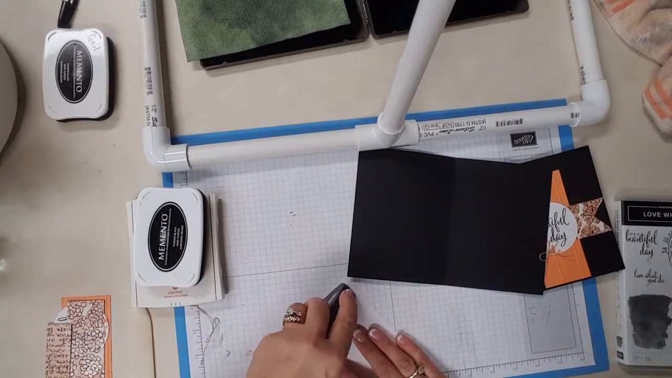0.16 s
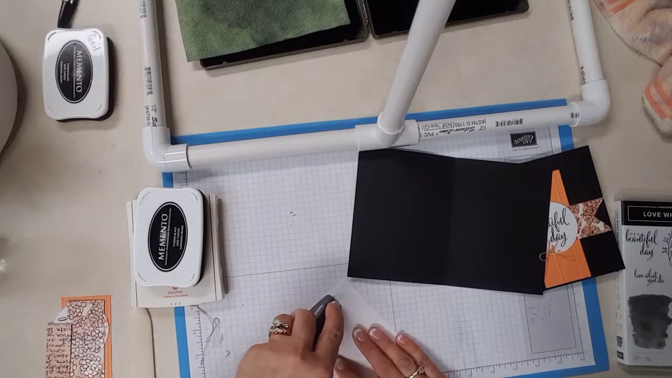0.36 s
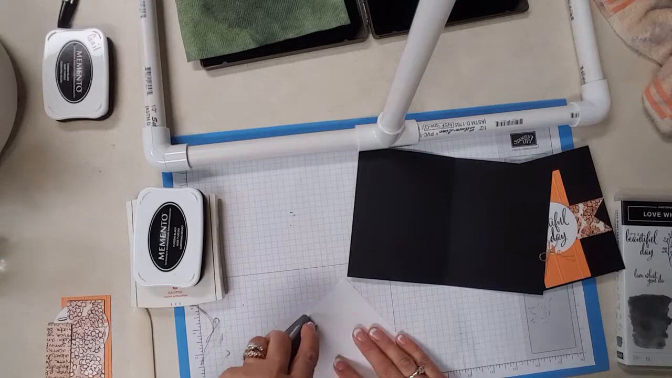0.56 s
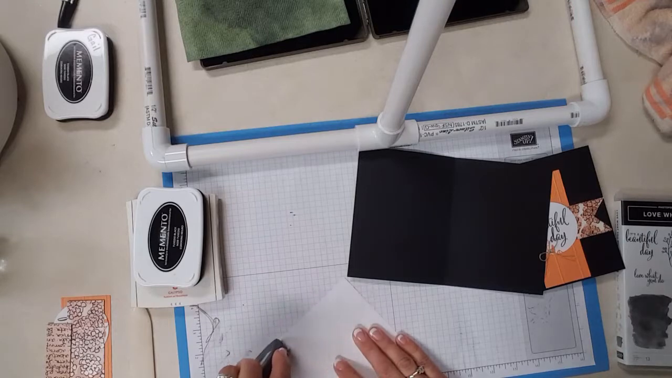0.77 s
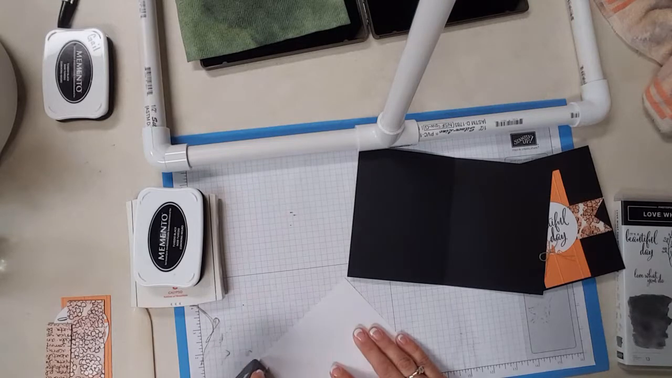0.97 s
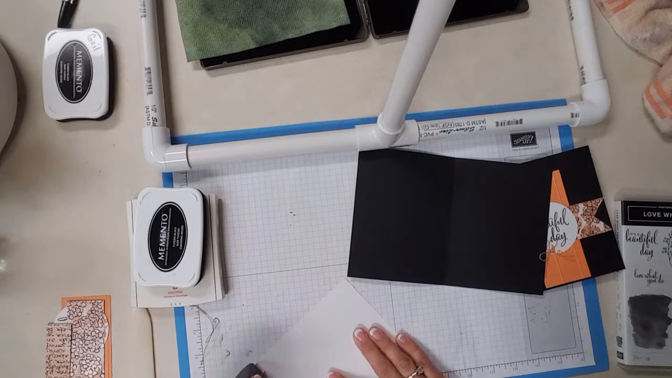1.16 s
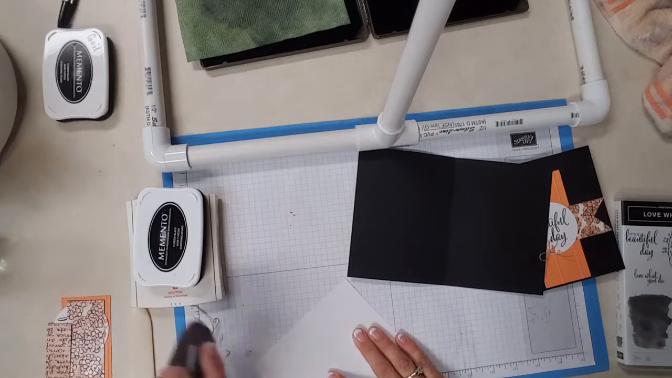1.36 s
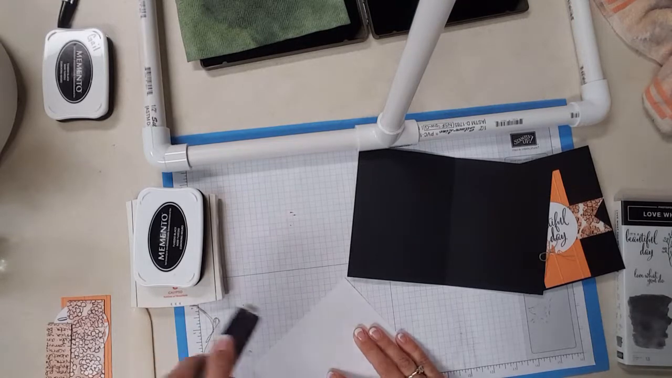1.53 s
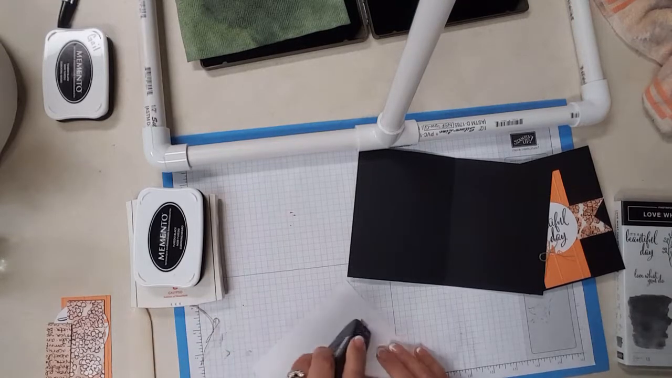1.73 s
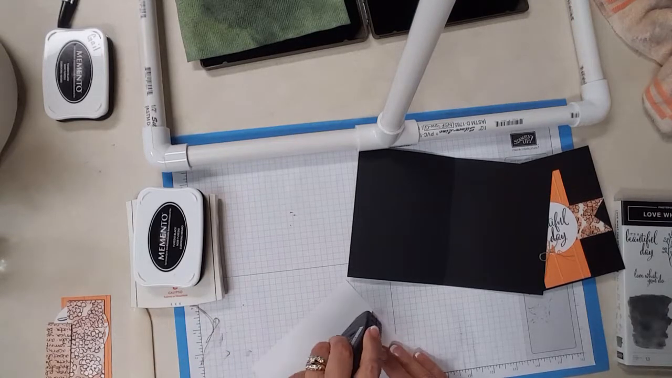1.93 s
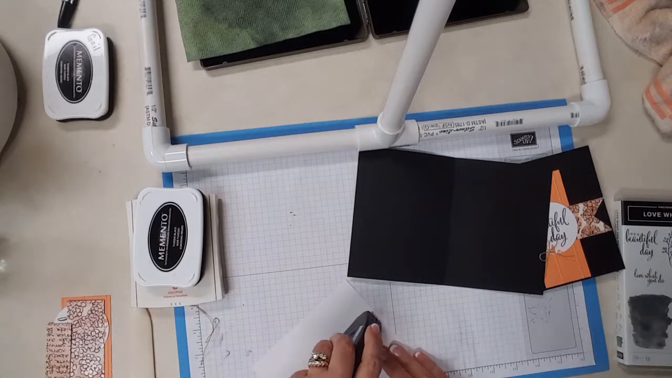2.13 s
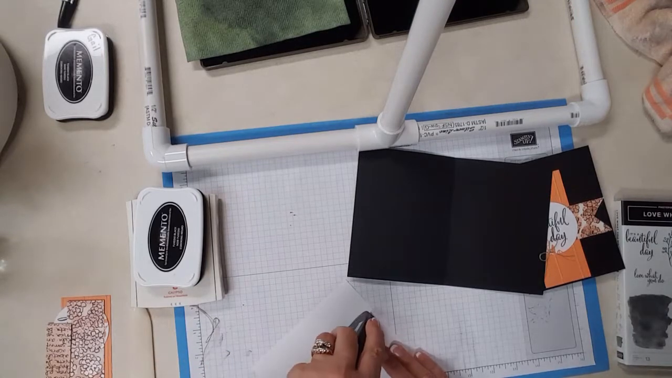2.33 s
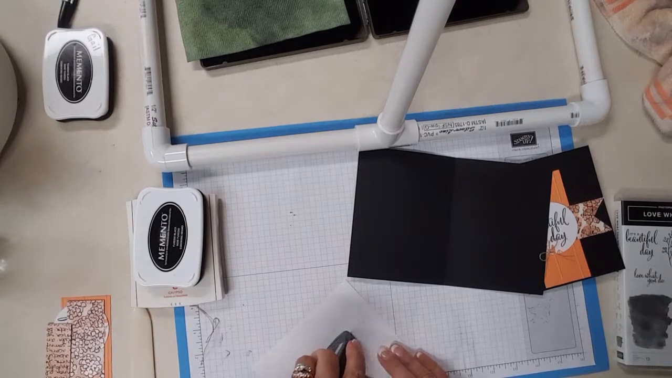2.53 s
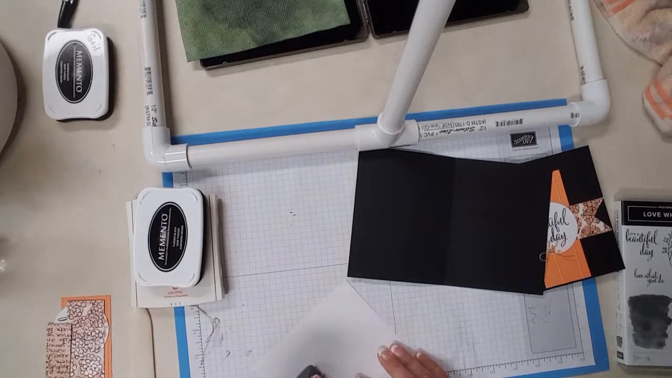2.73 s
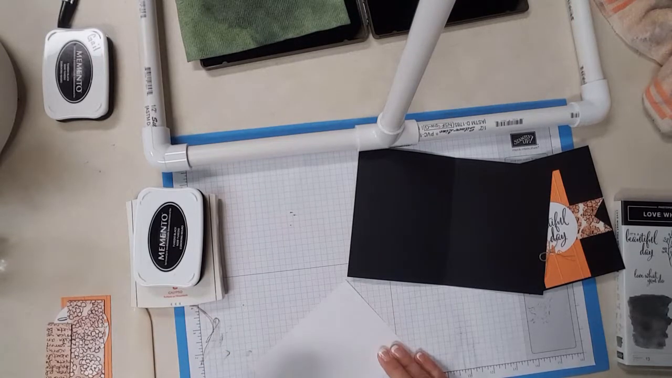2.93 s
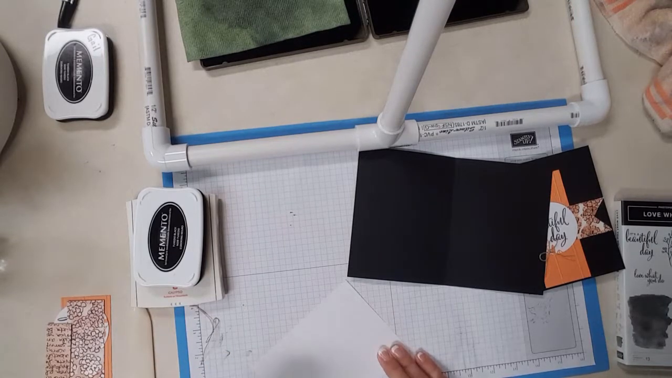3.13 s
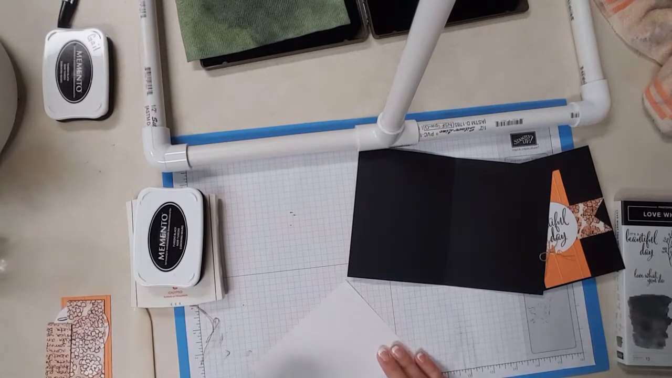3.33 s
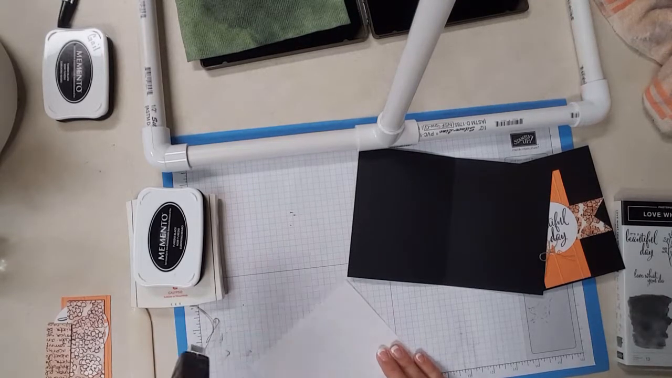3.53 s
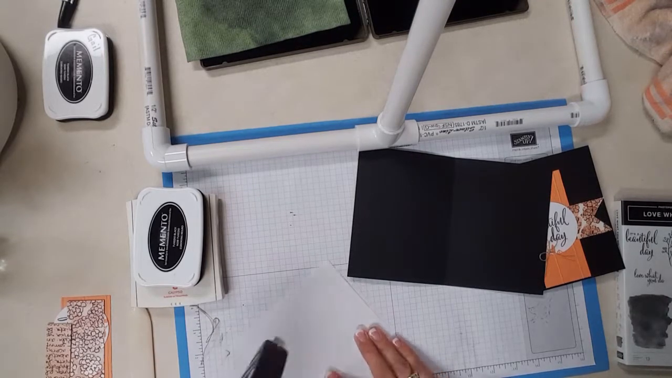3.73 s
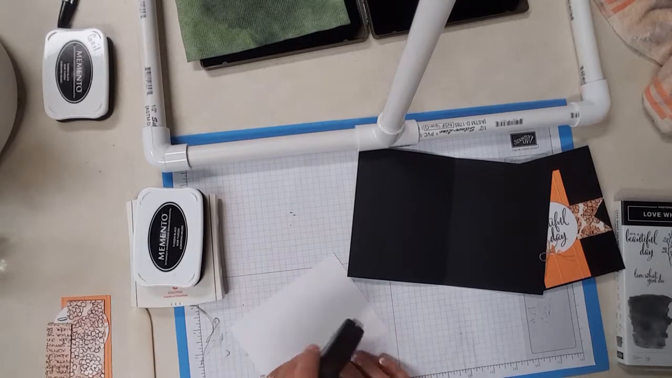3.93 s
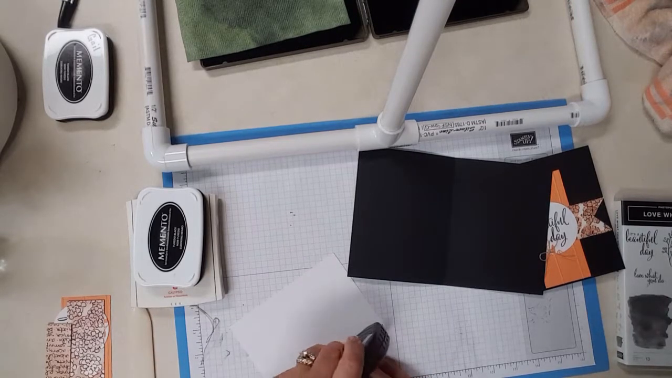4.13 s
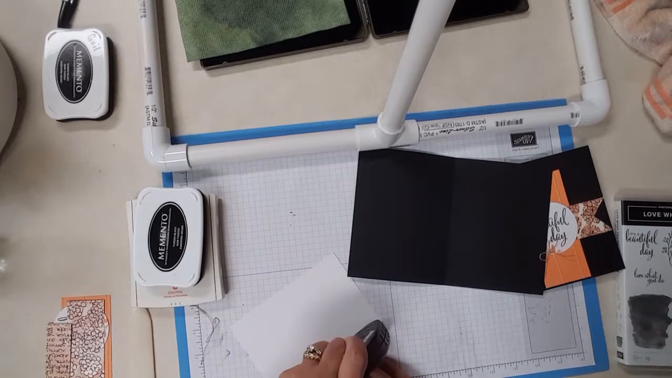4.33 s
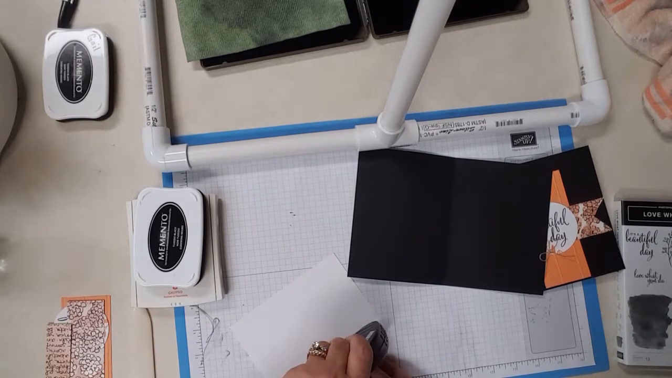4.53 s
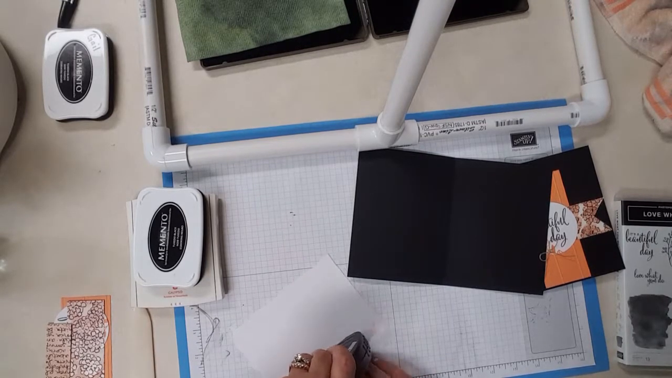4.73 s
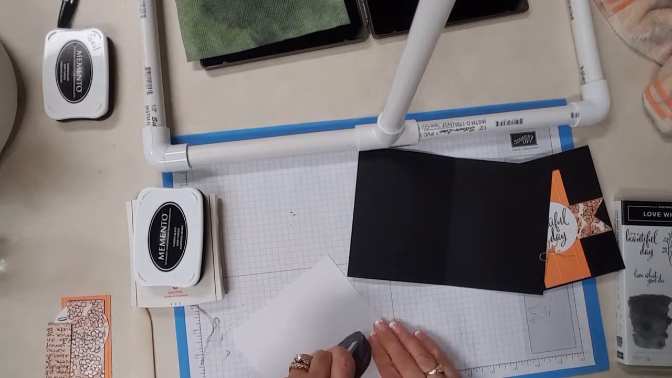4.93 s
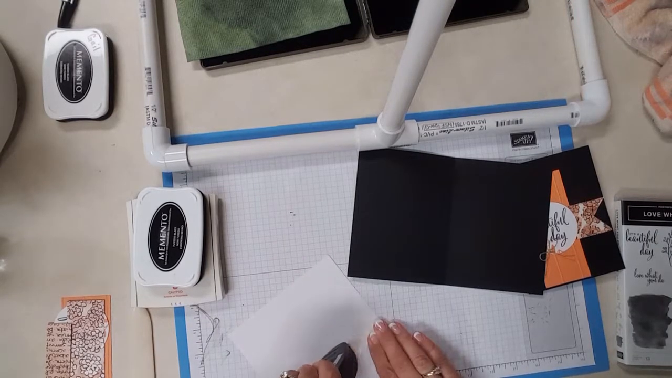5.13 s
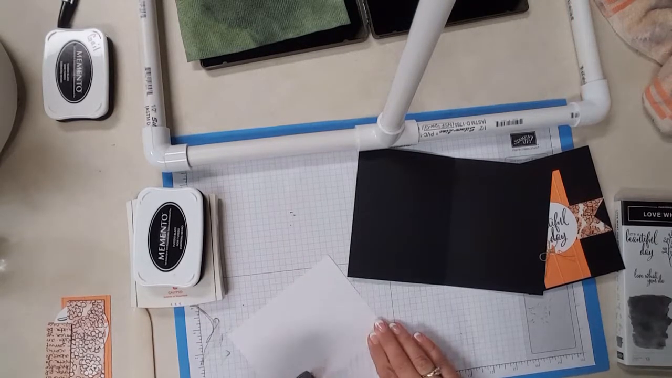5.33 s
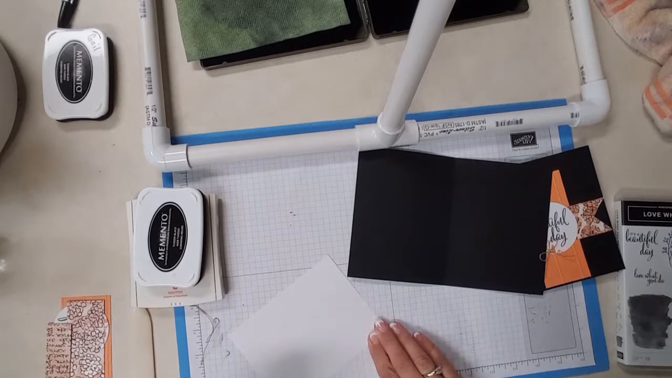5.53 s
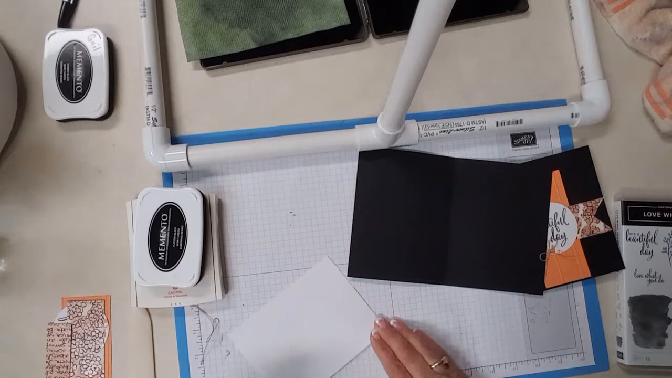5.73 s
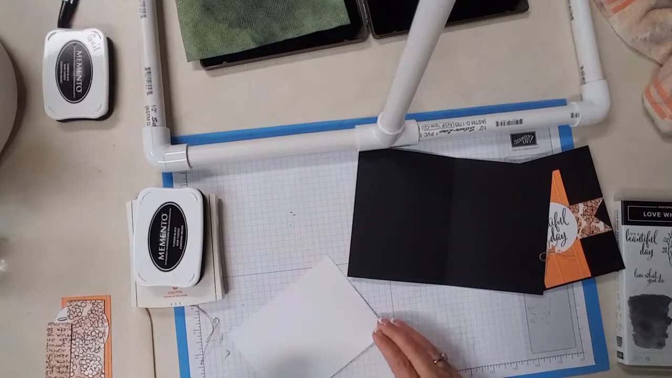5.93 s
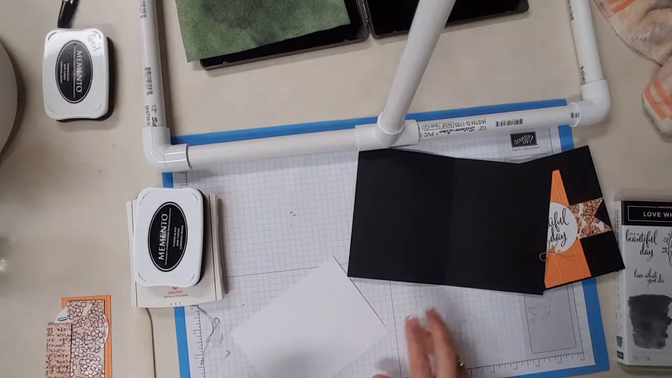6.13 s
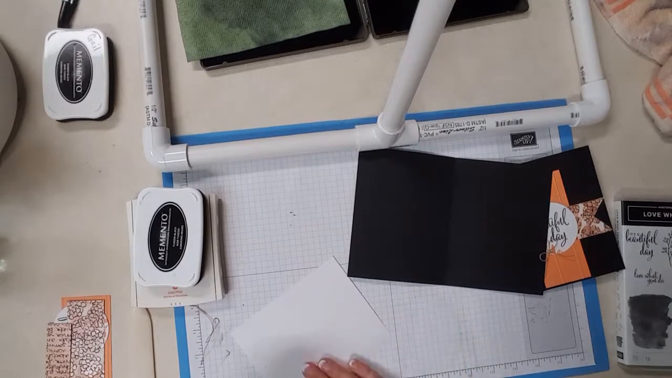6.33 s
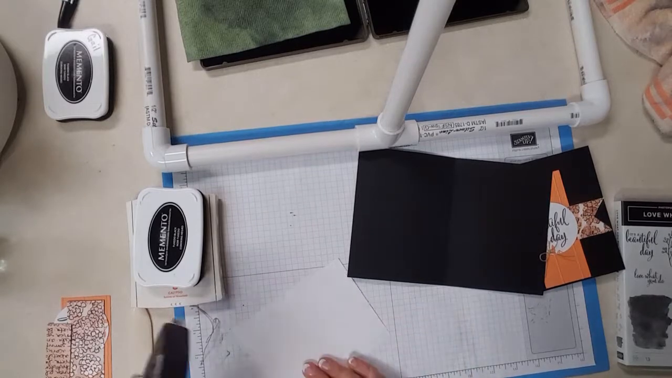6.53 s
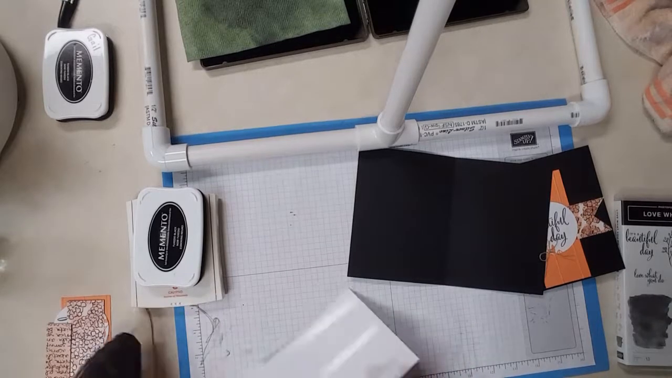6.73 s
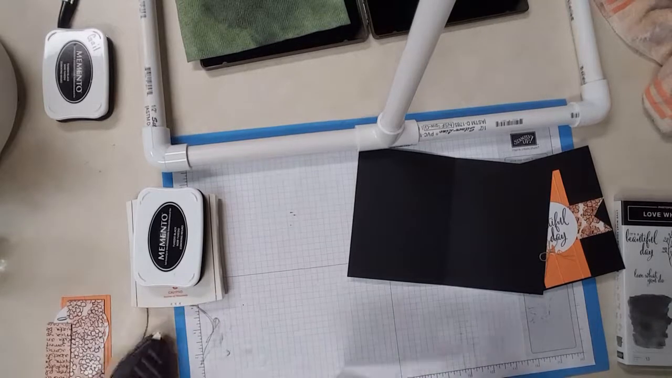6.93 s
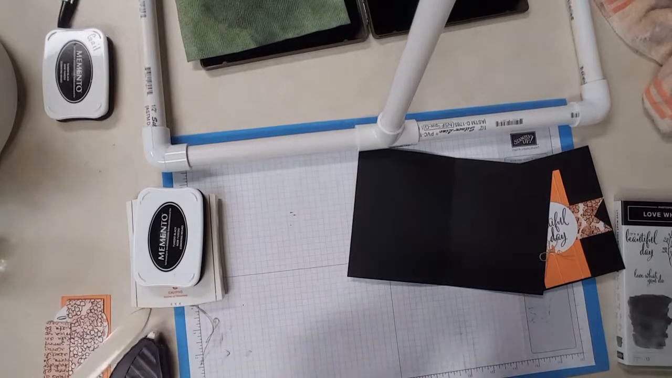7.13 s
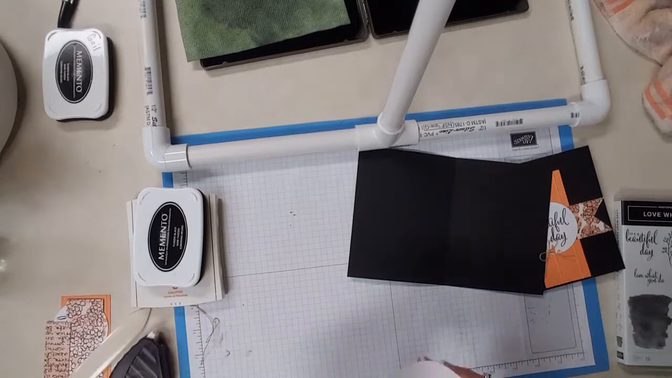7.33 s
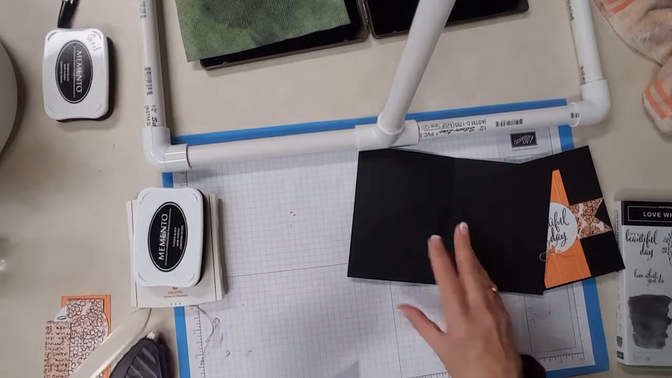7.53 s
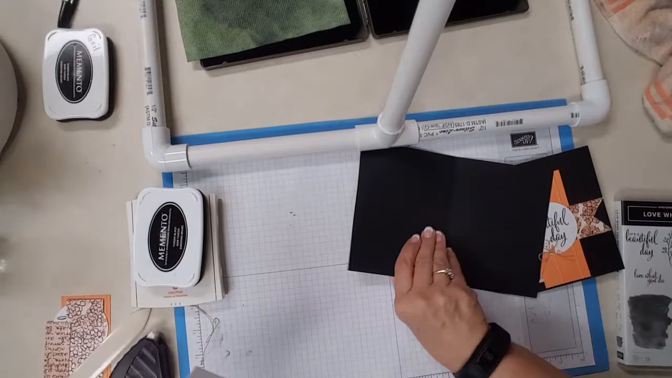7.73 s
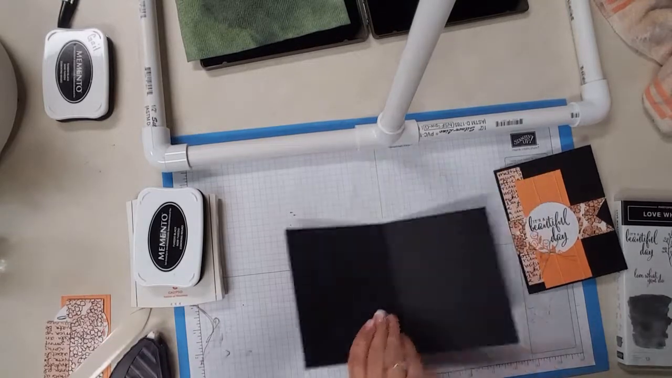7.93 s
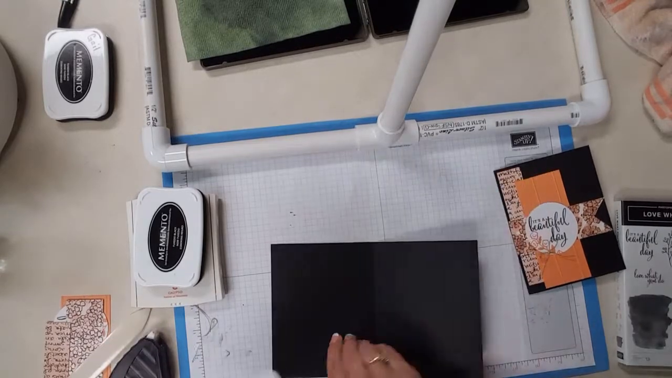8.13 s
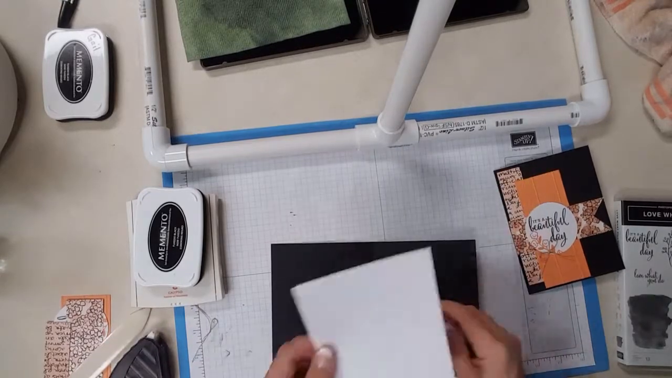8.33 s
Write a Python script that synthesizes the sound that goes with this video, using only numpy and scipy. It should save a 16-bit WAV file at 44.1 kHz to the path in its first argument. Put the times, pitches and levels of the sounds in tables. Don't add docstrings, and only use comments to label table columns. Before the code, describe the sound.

A quiet small room with faint air hiss, heard close above a craft table. Hollow plastic clicks at 0-0.2 s, then a soft ticking rasp from about 0.5 to 1.0 s as a tape runner rolls along paper, with a sharper knock at 0.85. Clicks and a short shiver at 1.4 as it lifts; small taps and sheet rustle to 2.1. A second ratcheting zip runs 2.4-3.0, bright clicks at 3.5, paper sliding until 4. A tap at 4.5, a very short rasp to 4.8, a click at 4.95, then the fastest, loudest zip at 5.1-5.5. Light double tap at 6.1, click at 6.5, thin paper rustle. At 6.88 the runner drops slightly left, bouncing loudly, hardest at 7.04, reels rattling, tumbling again around 7.4. From 7.7 stiff card scrapes and knocks, squeaks faintly around 8.2, and slaps sharply at 8.47.

```python
import sys
import numpy as np
from scipy import signal
from scipy.fft import rfft, irfft
from scipy.io import wavfile

SR = 44100
rng = np.random.default_rng(int(sys.argv[2]) if len(sys.argv) > 2 else 0)


def waveform_to_disk(signal):
    frames = np.transpose(np.atleast_2d(signal))
    scaled = np.clip(frames, -1, 1) * 32767
    samples = np.round(scaled).astype(np.int16)
    wavfile.write(sys.argv[1], SR, samples)


def volts_from_decibels(level):
    exponent = np.asarray(level, float) / 20
    return 10 ** exponent


N = 374409
T = np.arange(N) / SR

# t/s, pressure on the paper/dB, pull on the tape/dB
STROKES = [
    [(.004, -55, -65.5), (.1, -77.5, -88)],
    [(.309, -74, -70), (.345, -62, -63.5), (.461, -61.5, -71), (.513, -59.5, -65), (.702, -54, -59),
     (.82, -56, -66), (.89, -54.5, -62), (1.103, -61.5, -73.5), (1.18, -78, -78.5)],
    [(2.389, -68.5, -79.5), (2.542, -55.5, -56), (2.758, -52, -60.5), (3.051, -65, -75), (3.149, -82, -90)],
    [(4.54, -64.5, -72.5), (4.761, -57, -65.5), (4.849, -96, -101)],
    [(4.949, -57.5, -80.5), (5.064, -69, -76.5), (5.29, -48.5, -55), (5.368, -50.5, -55.5),
     (5.615, -63.5, -75.5), (5.679, -80, -88)],
]
# t/s, level/dB
CARD = [
    [(6.619, -76), (6.653, -76), (6.695, -66.5), (6.75, -70.5), (6.836, -64.5), (6.868, -63.5)],
    [(7.62, -75), (7.7, -66), (7.75, -54), (7.796, -53), (7.834, -47), (8.028, -57), (8.102, -48.5),
     (8.197, -61.5), (8.353, -67.5), (8.481, -48.5)],
]
# t/s, level/dB, hollow above it/dB, sharpness/dB
SHELL_TAPS = [(.0403, -37, -4, -13), (.1067, -56, 8, -11.5), (.1464, -68.5, 15, 1.5),
              (.178, -44.5, -12, -20), (0.3155, -49, 1.5, 4.5), (.3704, -50.5, -4, -20.5),
              (.3935, -49.5, -13.5, -0.5), (.848, -34.5, -7.5, -14), (1.2151, -55.5, -6, -14.5),
              (1.3842, -41, -11, -14), (1.4062, -36, -8.5, -1.5), (2.3866, -50.5, -15, 11),
              (3.1994, -66.5, 7, -10), (3.4785, -47.5, -1.5, 3.5), (3.52, -41.5, -10, 12),
              (4.5371, -42.5, -10, 7.5), (4.9392, -55.5, -15.5, -5.5), (4.9592, -53, 3, -0.5),
              (5.013, -61, -11, 19), (5.0495, -59.5, -8, 0.5), (5.8566, -60.5, -0.5, 2),
              (6.0466, -75, 19.5, 20), (6.1654, -60.5, 1.5, 14.5), (6.5051, -39, -4.5, 1)]
# t/s, level/dB, body above it/dB, sharpness/dB, body pitch f/Hz
EDGE_TAPS = [(1.4514, -47, 2.5, -20, 790), (1.6445, -65.5, -15, 16.5, 382), (1.786, -63, -8.5, 4, 604),
             (2.1286, -48, -39, 5, 1240), (3.489, -34.5, -3, -2, 893), (4.9455, -39.5, -7.5, 1, 912),
             (6.08, -39, -14.5, 9, 493), (6.092, -41, -13, 7, 484), (6.3903, -61, -7, 16.5, 472),
             (7.656, -56.5, -6.5, 4, 425), (7.7096, -40.5, -31, -14, 1290), (7.728, -52, -20, -13.5, 900),
             (7.754, -51.5, -10, -15.5, 1070), (7.8147, -32, -8, -19.5, 1134),
             (7.8593, -50, 6, -2.5, 419.3), (8.05, -53, -3.5, 10, 525), (8.0653, -41, 0, 6.5, 597.4),
             (8.098, -38.5, -3, -12, 686), (8.1117, -49, 9.5, -13.5, 444), (8.2656, -62, 22, -10.5, 500),
             (8.3934, -45.5, -2.5, -17.5, 806), (8.4361, -34, -5.5, -13.5, 874),
             (8.448, -41.5, -4.5, -1, 653), (8.4751, -21.5, -3.5, -13, 620.5)]
# t/s, level/dB, hollow above it/dB, paper snap/dB
LIFTS = [
    (1.395, -47, 0.5, -56.5),
    (3.481, -45.5, -6.5, -57),
    (6.082, -59.5, -1.5, -61),
    (6.502, -51.5, 4, -64),
]
LIFT_RISE_S, LIFT_HOLD_S = 0.0059, 0.0167
# f/Hz, width/Hz, level/dB
SHELL = [(582, 72, -1.5), (672, 75, -2), (780, 117, -8.5), (1120, 260, -14), (1530, 284, -15),
         (1904, 110, -8.5), (2107, 143.5, -5), (2264.6, 118.5, -4), (2520, 210, -7.5), (3000, 309, -12.5),
         (3455, 330, -10.5), (4324, 796, -20.5), (5640, 1770, -28), (7830, 1770, -29), (11330, 3300, -40.5),
         (14000, 2830, -49)]
# f/Hz, width/Hz, level/dB
DESK = [(324.5, 68, -10), (444, 31, -6), (618.2, 87.5, -0.5), (795.7, 70, -3), (995, 91, 0),
        (1132, 51.6, -4), (1234.5, 106, -5.5), (1522, 218, -7.5), (1830, 170, -6.5), (2126, 180, -6),
        (2500, 295, -9), (3158, 180, -13.5), (3838, 374, -20.5), (4948, 780, -24.5), (6600, 835, -20),
        (7976, 223, -11.5), (8570, 590, -21), (10990, 402, -21), (13500, 1730, -44.5)]
BAND_EDGES_HZ = [1350, 2800, 5000]


def rms_one(x):
    return x / np.sqrt(np.mean(x ** 2) + 1e-20)


def high_pass(x, hz):
    return signal.sosfilt(signal.butter(2, hz, "high", fs=SR, output="sos"), x)


def band_pass(x, edges_hz, order=2):
    return signal.sosfilt(signal.butter(order, edges_hz, "band", fs=SR, output="sos"), x)


def levels(tables):
    out = np.zeros((len(tables[0][0]) - 1, N))
    for rows in tables:
        s, *columns = np.transpose(rows)
        out += [volts_from_decibels(np.interp(T, s, c, left=-150, right=-150)) for c in columns]
    return out


def swell(s, db, rise_s, hold_s, fall_s):
    out = np.zeros(N)
    for at, top, rise, hold, fall in np.broadcast(s, db, rise_s, hold_s, fall_s):
        near = slice(max(round((at - 2 * rise) * SR), 0), round((at + hold + 2 * fall) * SR))
        late = np.maximum((at - T[near]) / rise, (T[near] - at - hold) / fall)
        out[near] += volts_from_decibels(top - 30 * np.clip(late, 0, None))
    return out


def at_hz(points, hz):
    f, value = np.transpose(points)
    return np.interp(np.log(hz + 1), np.log(f), value)


def stereo(mid, side, alike):
    return np.sqrt(1 + alike) * mid + np.sqrt(1 - np.minimum(alike, 1)) * side * [[1], [-1]]


def coloured(spectrum, source):
    # f/Hz, likeness
    likeness = [(60, 0.53), (240, 0.514), (950, 0.305), (3770, -0.088), (15000, 0.144)]
    hz = np.fft.rfftfreq(N, 1 / SR)
    mid, side = rfft(source) * volts_from_decibels(at_hz(spectrum, hz))
    alike = np.clip(at_hz(likeness, hz), 0, 1)
    return rms_one(irfft(stereo(mid, side, alike), N))


def grains(per_s, spread_db, channels=1):
    sizes = volts_from_decibels(spread_db * np.minimum(rng.exponential(1, N), 4)) * (rng.random(N) < per_s / SR)
    clumps = signal.lfilter([1], [1, -.9], sizes)
    return rms_one(rng.standard_normal((channels, N)) * (1 + clumps))


def ring(drive, hz, width_hz):
    r, w = np.exp(-np.pi * width_hz / SR), 2 * np.pi * hz / SR
    return signal.lfilter([0, np.sin(w)], [1, -2 * r * np.cos(w), r * r], drive + 1e-18)


def rings(rows):
    rise_s = 0.00051
    t = np.arange(8000) / SR
    out = np.zeros(N + len(t))
    for s, db, hz, width_hz in rows:
        shape = np.exp(-np.pi * width_hz * t) * (1 - np.exp(-t / rise_s))
        out[round(s * SR):][:len(t)] += volts_from_decibels(db) * np.sin(2 * np.pi * hz * t) * shape
    return out[:N]


def by_band(hits):
    upper_follows = 0.476
    s, db, low, sharp = np.transpose([row[:4] for row in hits])
    return np.transpose([s, db, low, upper_follows * sharp, sharp])


def damped(modes, widening):
    return np.array(modes) * [1, widening, 1]


def struck(modes, hits, rubbing, contact_ms, rough, scatter_db):
    s, mid_db, low, upper, top = np.transpose(hits)
    band_db = mid_db + np.array([low, 0 * s, upper, top])
    step = np.arange(600)
    fade = np.exp(-step * 1000 / SR / contact_ms)
    where = (np.round(s * SR).astype(int)[:, None] + step).ravel()
    hz, width_hz, mode_db = np.transpose(modes)
    band = np.searchsorted(BAND_EDGES_HZ, hz)
    weight = volts_from_decibels(mode_db) * width_hz
    scatter = rng.normal(0, 1, (len(s), len(hz)))
    out = np.zeros(N)
    for k, b in enumerate(band):
        share = weight[k] / np.sqrt(np.sum(weight[band == b] ** 2))
        trail = rough * rng.standard_normal((len(s), len(step))) * fade / np.linalg.norm(fade)
        force = ((step == 0) + trail) * volts_from_decibels(band_db[b] + scatter_db * scatter[:, k])[:, None]
        drive = np.bincount(where, force.ravel(), N + len(step))[:N]
        drive += rubbing[b] * np.sqrt(width_hz[band == b].mean() / SR)
        out += share * (-1) ** k * ring(drive, hz[k], width_hz[k])
    return high_pass(out, 220.)


def placed(x, left_db, lead_s, wet_db):
    # f/Hz, t60/s, left-right likeness
    decay = [(191.6, 0.452, 0.884), (937, 0.3216, 0.5), (3896, 0.2454, 0.5), (12600, 0.098, .1)]
    head_shade_hz = 250
    t, hz = np.arange(SR // 2) / SR, np.fft.rfftfreq(N + SR, 1 / SR)
    tail = np.zeros((2, len(t)))
    for f, t60, alike in decay:
        mid, side = rng.standard_normal((2, len(t)))
        band = band_pass(stereo(mid, side, alike), [f / 2.2, min(f * 2.2, .45 * SR)], order=1)
        tail += band * volts_from_decibels(-60 * t / t60)
    tail *= (1 - np.exp(-t / 0.00087)) / np.sqrt(np.sum(tail ** 2, axis=1, keepdims=True))
    shade = volts_from_decibels(hz / (hz + head_shade_hz) * [[left_db / 2], [-left_db / 2]])
    delay = np.exp(-2j * np.pi * hz * [[0], [lead_s]])
    room = 1 + volts_from_decibels(wet_db) * rfft(tail, N + SR)
    return irfft(rfft(x, N + SR) * shade * delay * room, N + SR)[:, :N]


def room_tone():
    # f/Hz, level per Hz/dB
    air = [(12, -48.5), (20, -28.5), (51, -10.5), (232, -11.5), (591, -16.5), (778, -17.5), (1310, -20),
           (1590, -20), (1880, -19), (4410, -29), (14400, -38)]
    # f/Hz, level/dB
    hum = [(120, -83), (151, -79.5), (240, -82), (360, -87), (480, -82)]
    tones = sum(np.sqrt(2) * volts_from_decibels(db) * np.sin(2 * np.pi * (hz * T + rng.random())) for hz, db in hum)
    noise = volts_from_decibels(-68.5) * coloured(air, rng.standard_normal((2, N)))
    return (noise + tones) * volts_from_decibels([[.6], [-.6]])


def thuds():
    # t/s, level/dB, f/Hz
    presses = [(0.328, -64, 94.5), (0.838, -53.5, 234), (3.618, -58.5, 227), (5.016, -51, 141.7),
               (5.038, -58.5, 86.1), (6.385, -55.5, 103.7), (7.06, -41.5, 123.3), (7.43, -47, 232),
               (7.65, -54.5, 234), (8.12, -58, 100.4)]
    # t/s, level/dB
    wrist = [
        [(0, -77), (3.5, -79.5), (3.66, -64), (4.1, -75.5), (6.8, -71.5), (7.06, -46.5), (7.35, -63.5),
         (7.6, -69), (7.9, -65.5), (8.49, -73)],
    ]
    rumble = rms_one(band_pass(rng.standard_normal(N), [65., 270.]))
    out = (volts_from_decibels(-2.0) * levels(wrist)[0] + volts_from_decibels(-19.0) * levels(STROKES)[0]) * rumble
    for s, db, hz in presses:
        t = np.clip(T - s, 0, None)
        out += volts_from_decibels(db + 5.0) * np.sin(2 * np.pi * hz * t) * np.exp(-t * hz / 1.43)
    return out


def sheet_level():
    # t/s, level/dB, 30 dB rise/s, hold/s, 30 dB fall/s (a row with a negative time
    slides = [(0.179, -74, 0, .001, 0.07), (0.321, -73.5, 0.07, .03, -0.04),
              (0.848, -70.5, 0.13, 0.019, 0.21), (1.657, -72.5, 0.04, .001, 0.07),
              (1.792, -67, 0.05, .001, 0.0756), (2.13, -83, -0.25, .02, -0.04),
              (2.395, -79, -0.31, .01, 0.24), (3.235, -81, -0.6, 0.00104, -0.08),
              (3.678, -65, 0.33, .11, 0.27), (4.54, -73.5, -0.16, 0.0097, 0.18),
              (4.79, -71, 0.2, 0.075, 0.06), (4.952, -74.5, 0.15, .001, 0.13),
              (5.794, -74.5, 0.05, .001, 0.57), (6.399, -72.5, 0.06, .001, 0.4)]
    pressure = levels(STROKES)[0] / volts_from_decibels(-57)
    stroked = volts_from_decibels(-70) * pressure ** 0.807
    s, _, _, snap_db = np.transpose(LIFTS)
    snapped = swell(s, snap_db, LIFT_RISE_S, LIFT_HOLD_S, fall_s=0.181)
    picked_up, dragged = levels(CARD[:1])[0], levels(CARD[1:])[0]
    carried = volts_from_decibels(-.5) * picked_up + volts_from_decibels(-12.5) * dragged
    return stroked + snapped + swell(*np.transpose(slides)) + carried


def paper():
    # f/Hz, level per Hz/dB
    sheet_colour = [(710, -26.5), (1200, 0.5), (1300, -3.5), (1450, -1.5), (6200, -4.5), (7960, -6),
                    (14400, -17.5)]
    # f/Hz, level per Hz/dB
    card_colour = [(88, -22.5), (150, -3), (650, -2.5), (885, -6.5), (1500, -0.5), (2570, -5),
                   (3240, -11.5), (6000, -22.5), (7800, -57.5), (13200, -120)]
    # t/s, level/dB
    singing = [
        [(8.05, -70.5), (8.12, -62), (8.21, -59.5), (8.3, -61.5), (8.38, -72.5)],
    ]
    sheet = sheet_level() * coloured(sheet_colour, grains(per_s=450., spread_db=3.5, channels=2))
    card = levels(CARD) * coloured(card_colour, grains(per_s=120.0, spread_db=5.0, channels=2))
    squeak = levels(singing) * rms_one(ring(rng.standard_normal(N), hz=1225, width_hz=85))
    return (volts_from_decibels(4.0) * sheet + card + squeak) * volts_from_decibels([[1.4], [-1.4]])


def glue_snaps():
    # t/s, level/dB
    strands = [(4.5962, -54), (4.6746, -61), (4.733, -61), (4.7424, -55), (4.752, -58), (4.757, -55),
               (4.762, -58), (4.772, -56), (5.0931, -61), (5.161, -59), (7.9971, -60)]
    strand_band_hz = [5500., 12500.]
    s, db = np.transpose(strands)
    step = np.arange(300)
    fade = np.exp(-step * 1000 / SR / .7)
    puffs = volts_from_decibels(db + 6.0)[:, None] * rng.standard_normal((len(s), len(step))) * fade
    where = np.round(s * SR).astype(int)[:, None] + step
    return band_pass(np.bincount(where.ravel(), puffs.ravel(), N), strand_band_hz)


def card_taps():
    slaps = by_band([row for row in EDGE_TAPS if row[0] > CARD[1][0][0]]) + [0, 0, -6.5, 1.5, 1.5]
    return volts_from_decibels(9.0) * struck(damped(DESK, 2.083), slaps, [0, 0, 0, 0], contact_ms=1.36, rough=0.43, scatter_db=1.5)


def knocks():
    hollow_hz = 628
    t = np.arange(2000) / SR
    out = np.zeros(N + len(t))
    for s, db, low, sharp, hz in [(*row, hollow_hz) for row in SHELL_TAPS] + EDGE_TAPS:
        shape = np.exp(-t * hz / 2.94) * (1 - np.exp(-t * hz * 3.44))
        out[round(s * SR):][:len(t)] += volts_from_decibels(db + low + 4.0) * np.sin(2 * np.pi * hz * t) * shape
    return out[:N]


def handling():
    # t/s, level/dB, f/Hz, width/Hz
    clear_rings = [(.848, -36.5, 2027, 60), (1.3845, -46, 2173, 120), (.316, -48, 1397, 100),
                   (2.1287, -37, 3220, 320), (2.1287, -45, 4200, 500), (2.1287, -55.5, 2247, 150),
                   (4.5375, -45.5, 2550, 200), (4.5375, -47, 3570, 250), (1.4062, -31, 738.4, 55),
                   (1.412, -42, 1150, 120), (1.409, -38.5, 2008, 50), (1.436, -47.5, 790, 35),
                   (3.4905, -28, 2071, 110), (3.5205, -27, 4230, 500), (3.521, -43.5, 733, 50),
                   (4.5375, -38, 2135, 60), (6.08, -29, 2380, 350), (6.092, -27.5, 2715, 300),
                   (6.506, -39.5, 1007, 100), (6.506, -42.5, 1796, 120), (7.8146, -36.5, 1527, 90),
                   (7.815, -38, 2500, 400), (8.2316, -53, 1700, 250), (8.11, -46, 2700, 400),
                   (7.845, -43, 494, 40), (7.845, -48, 317, 40), (8.4746, -26, 430.6, 60),
                   (8.4746, -24.5, 1226, 80), (8.4746, -26.5, 807, 100), (8.4755, -26, 3100, 600),
                   (8.476, -30.5, 1550, 200), (8.476, -30, 8040, 600), (8.065, -43.5, 8300, 700),
                   (8.05, -50, 8300, 700), (7.7099, -45.5, 2500, 400), (8.449, -37.5, 3000, 500)]
    s, db, hollow_db, _ = np.transpose(LIFTS)
    loose = grains(per_s=350.0, spread_db=3.0)[0]
    low = loose * swell(s, db + hollow_db, LIFT_RISE_S, LIFT_HOLD_S, fall_s=0.177)
    mid = loose * swell(s, db, LIFT_RISE_S, LIFT_HOLD_S, fall_s=0.116)
    shiver = [low * volts_from_decibels(0.5), mid * volts_from_decibels(6.5), mid * volts_from_decibels(-6.0), mid * volts_from_decibels(-28.5)]
    desk_lows = [m for m in DESK if m[0] < BAND_EDGES_HZ[0]]
    shell_highs = [m for m in SHELL if m[0] > BAND_EDGES_HZ[0]]
    held = damped(desk_lows + shell_highs, 1.217)
    before_card = [row[:4] for row in EDGE_TAPS if row[0] < CARD[1][0][0]]
    taps = by_band(SHELL_TAPS + before_card) + [0, 0.5, -6.5, 3.0, 5.0]
    body = volts_from_decibels(4.0) * struck(held, taps, shiver, contact_ms=1.13, rough=0.488, scatter_db=1.0949)
    return knocks() + rings(clear_rings) + body


def drop():
    # t/s, level/dB, hollow above it/dB, sharpness/dB
    bounces = [(6.8777, -16.5, 2, -9.5), (6.8944, -25.5, -2.5, -3.5), (6.9114, -19.5, 1, -23),
               (6.9651, -19, 2, -30.5), (7.0335, -18, 4, -3), (7.0374, -16, -18, 3.5),
               (7.0514, -22, 1, -12.5), (7.0674, -26.5, 5, -13), (7.1197, -29, -5.5, -6),
               (7.1264, -36, -16, 6.5), (7.2424, -32, -3, -14), (7.2964, -48.5, 15, -20.5),
               (7.3597, -33, 0, 0), (7.419, -24, -6, -5), (7.436, -25.5, 0, -10), (7.4789, -38, -14, -18.5)]
    # t/s, level/dB, hold/s, 30 dB fall/s, jingle above it/dB
    rattle = [
        (6.88, -35.5, 0.1024, 0.026, -19),
        (7.036, -28, 0.018, 0.3183, -14),
        (7.358, -58.5, 0.029, 0.23, 0),
        (7.415, -40, 0.0256, 0.1147, -5.5),
    ]
    # t/s, level/dB, f/Hz, width/Hz
    clear_rings = [(6.8785, -24, 623, 50.1), (6.8778, -19.5, 1132, 70), (6.8785, -25, 3330, 250),
                   (6.894, -32, 1846, 70), (6.895, -34, 3400, 250), (6.9, -31.5, 2379, 80),
                   (6.9115, -34, 1550, 80), (6.9645, -26.5, 1437, 90.6), (6.879, -26, 1320, 70),
                   (6.9115, -20.5, 995, 60), (6.9115, -22.5, 1231, 64.81), (6.916, -25.5, 628, 45.1),
                   (6.9645, -25.5, 628, 37.04), (6.9645, -22, 1115, 70), (6.9645, -23.5, 2146, 80),
                   (7.0343, -7, 1150, 500), (7.0335, -17, 1112, 54), (7.0335, -19.5, 746, 55.56),
                   (7.036, -20.5, 1830, 50), (7.037, -18, 2140, 90), (7.0345, -26, 8100, 90),
                   (7.037, -23, 7973, 110), (7.052, -28.5, 2115, 55), (7.0685, -19.5, 608.5, 28),
                   (7.034, -13, 3550, 450), (7.037, -27.5, 5000, 299), (7.052, -28, 1760, 60),
                   (7.062, -25.5, 3746, 100), (7.0685, -29, 1555, 60), (7.0685, -28.5, 1001, 50),
                   (7.0685, -28.5, 464, 50), (7.086, -24.5, 824.8, 30), (7.114, -30.5, 815, 35),
                   (7.114, -30, 578.7, 33), (7.1265, -35.5, 8070, 120), (7.138, -33.5, 7860, 120),
                   (7.243, -40, 2050, 45), (7.243, -38, 1742, 60), (7.293, -37, 522, 23.9),
                   (7.293, -38, 316.5, 40), (7.3605, -36, 993, 200), (7.4185, -22, 1977, 70),
                   (7.4185, -22, 2412, 120), (7.4185, -31.5, 1790, 90), (7.4789, -44.5, 1808, 79.5),
                   (7.4195, -25, 7800, 350), (7.4355, -33, 8200, 500), (7.4245, -32, 2200, 250),
                   (7.44, -36, 420, 60), (7.436, -26, 1919, 150), (7.436, -28, 2200, 200),
                   (7.4835, -40, 1900, 200)]
    s, db, hold_s, fall_s, jingle_db = np.transpose(rattle)
    loose = grains(per_s=600., spread_db=3.5)[0]
    body = loose * swell(s, db, 0.0123, hold_s, fall_s)
    jingle = loose * swell(s, db + jingle_db, 0.0119, 0.437 * hold_s, 0.8 * fall_s)
    rubbing = [body * volts_from_decibels(4.5), body * volts_from_decibels(8.5), body * volts_from_decibels(0.5), jingle * volts_from_decibels(9.5)]
    hits = by_band(bounces) + [0, 3.0, -7.5, 0.5, -2.5]
    impacts = struck(damped(DESK, 1.506), hits, rubbing, contact_ms=2.11, rough=0.679, scatter_db=3.0)
    return rings(clear_rings) + volts_from_decibels(3.0) * impacts


def ratchet():
    # t/s, level/dB
    teeth = [
        [(0.5317, -51.5), (0.5427, -48.5), (0.5686, -52), (0.5974, -50), (0.6185, -42.5), (0.6394, -42),
         (0.6539, -41.5), (0.6729, -40), (0.6894, -45.5), (0.7014, -47.5), (0.7164, -45), (0.7297, -42.5),
         (0.7494, -51.5), (0.7692, -44.5), (0.7874, -53), (0.9094, -47.5), (0.9288, -44), (0.9704, -49)],
        [(2.4409, -56), (2.4543, -55), (2.4912, -49.5), (2.5187, -44), (2.5416, -39.5), (2.5641, -45.5),
         (2.5845, -42.5), (2.605, -43.5), (2.6219, -40), (2.6384, -41.5), (2.6564, -40), (2.6714, -43),
         (2.6864, -48.5), (2.7018, -49), (2.7154, -47.5), (2.7302, -45.5), (2.7454, -53.5), (2.7644, -54.5),
         (2.7844, -57), (2.8075, -53.5), (2.8384, -59), (2.8574, -57.5), (2.8828, -52), (2.9203, -57.5),
         (2.9402, -57)],
        [(4.6319, -55.5), (4.6623, -44), (4.6877, -43), (4.7112, -49.5), (4.7381, -50.5)],
        [(5.1302, -58), (5.1602, -46), (5.1846, -41.5), (5.2041, -42.5), (5.2225, -40), (5.24, -42.5),
         (5.256, -35), (5.2704, -41), (5.2859, -34.5), (5.3014, -42.5), (5.3168, -38), (5.3314, -42.5),
         (5.3472, -39), (5.3614, -42.5), (5.3787, -41), (5.3924, -46.5), (5.4084, -47.5), (5.4256, -45.5),
         (5.4434, -55.5), (5.4634, -54.5)],
    ]
    hollow, bright = levels(STROKES)
    ticks = []
    for s, db in sum(teeth, []):
        hollow_db = 20 * np.log10(hollow[round(s * SR)]) - db + 6.0
        ticks.append((s, db + 5.0, hollow_db, -7.0, -21.0))
    peel = grains(per_s=400.0, spread_db=1.5)[0]
    rubbing = [peel * hollow * volts_from_decibels(5.5), peel * bright * volts_from_decibels(11.0), peel * bright * volts_from_decibels(5.5), 0]
    return high_pass(struck(SHELL, ticks, rubbing, contact_ms=1.0, rough=.35, scatter_db=1.2), 360.)


def scene():
    near_wet_db, aside_wet_db = -8, -5
    back = np.clip((T - 7.345) * 100, 0, 1)
    beds = room_tone() + paper()
    hands = thuds() + card_taps() + handling() + ratchet()
    near = placed(hands, left_db=4.0, lead_s=.00007, wet_db=near_wet_db)
    landing = drop()
    aside = placed(landing * (1 - back), left_db=4.0, lead_s=0.0002131, wet_db=aside_wet_db)
    returned = volts_from_decibels(-2.0) * landing * back + glue_snaps()
    settled = placed(returned, left_db=3.0, lead_s=0.00012, wet_db=near_wet_db)
    return near + aside + settled + beds


def roll_off(x):
    return signal.sosfilt(signal.butter(12, 16480, fs=SR, output="sos"), x)


def record(dry):
    # f/Hz, level/dB
    port = [(6000, -1.5), (8300, 2.5), (9400, 2.5), (10100, -4.5), (11000, 0.5), (14500, 5.5), (14900, -23),
            (16500, -29.5)]
    heard = irfft(rfft(dry) * volts_from_decibels(at_hz(port, np.fft.rfftfreq(N, 1 / SR))), N)
    return roll_off(heard - .0005)


dry = scene()
out = record(dry)
waveform_to_disk(out)
```